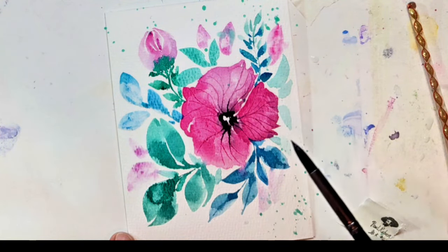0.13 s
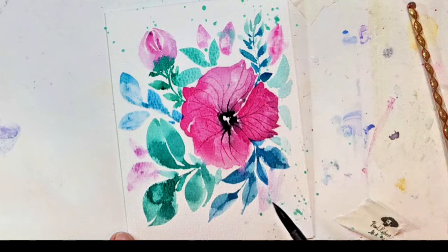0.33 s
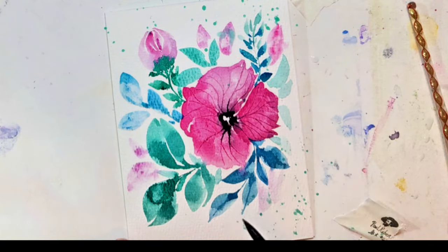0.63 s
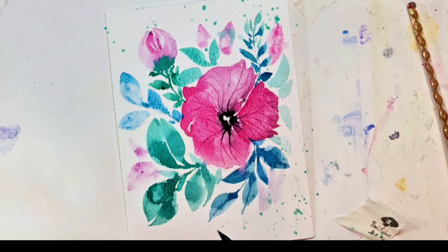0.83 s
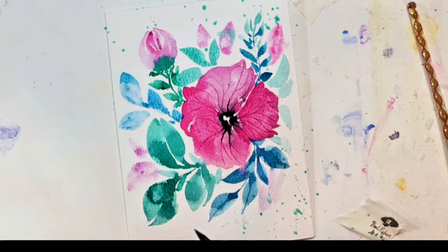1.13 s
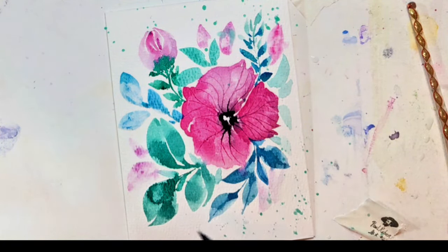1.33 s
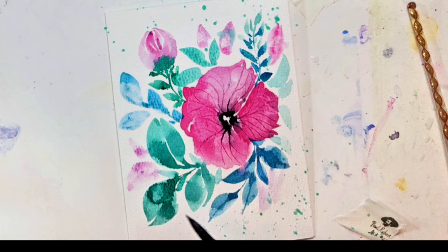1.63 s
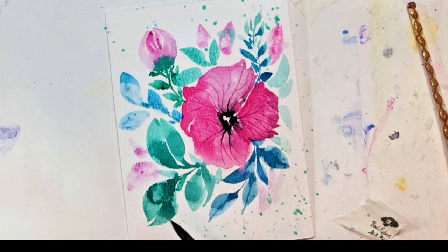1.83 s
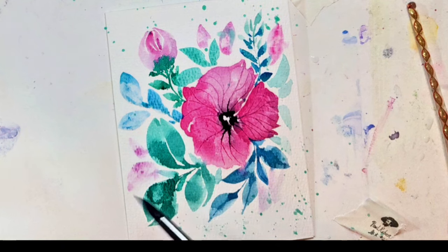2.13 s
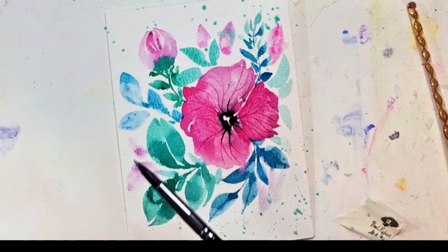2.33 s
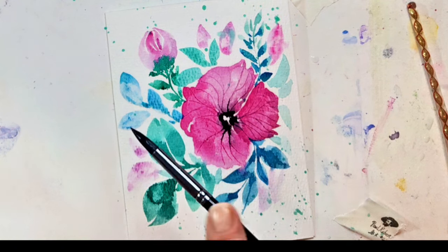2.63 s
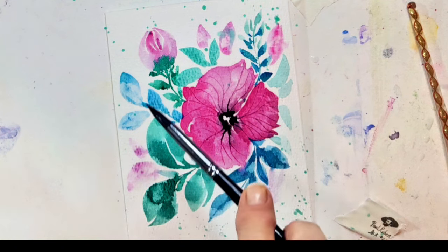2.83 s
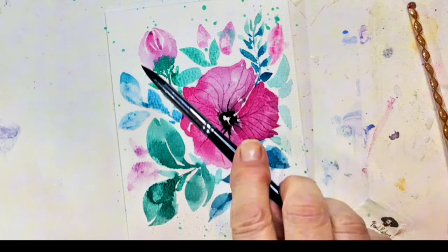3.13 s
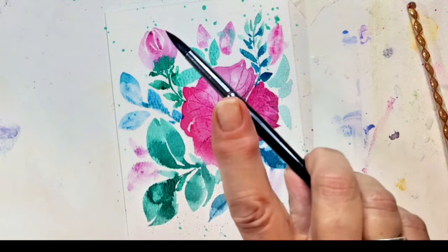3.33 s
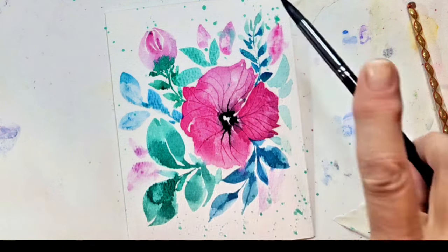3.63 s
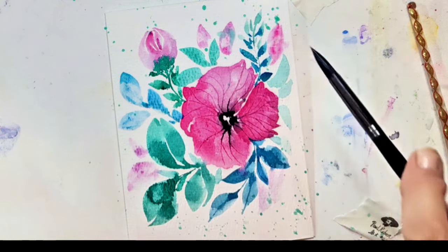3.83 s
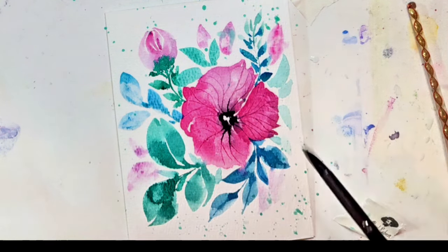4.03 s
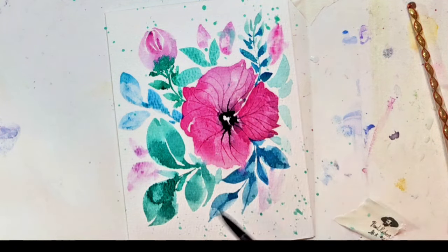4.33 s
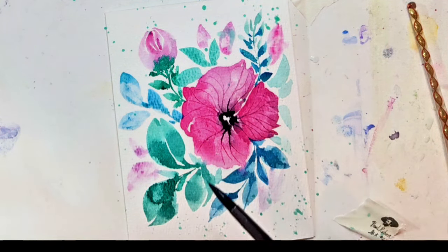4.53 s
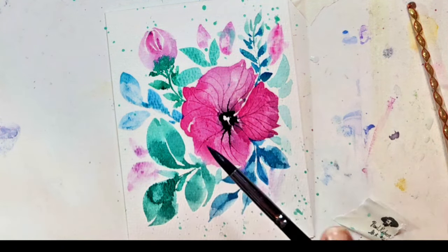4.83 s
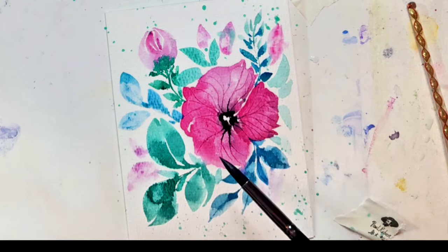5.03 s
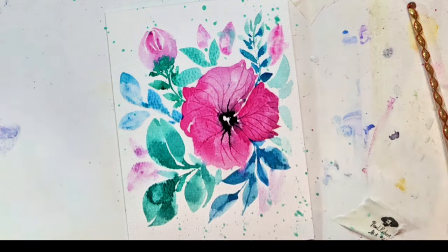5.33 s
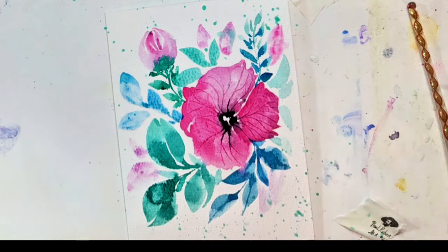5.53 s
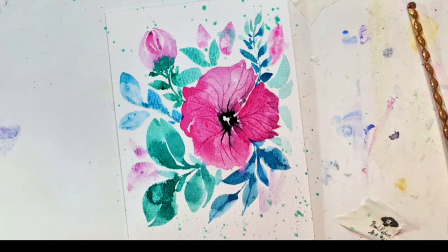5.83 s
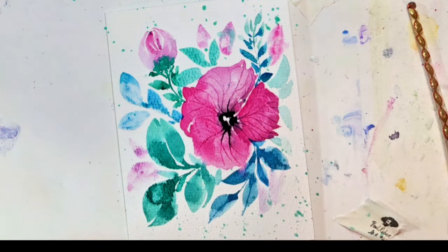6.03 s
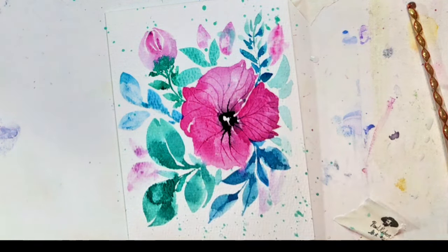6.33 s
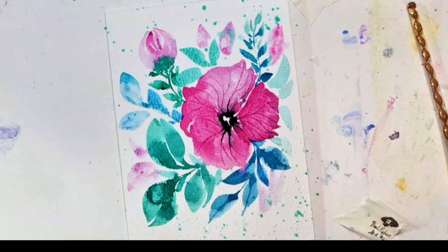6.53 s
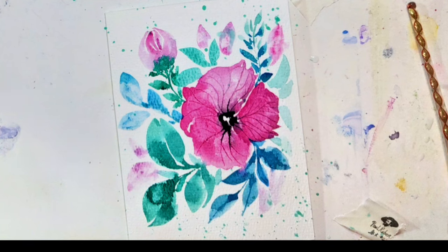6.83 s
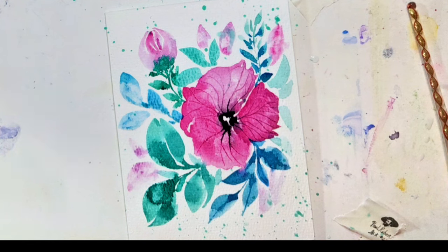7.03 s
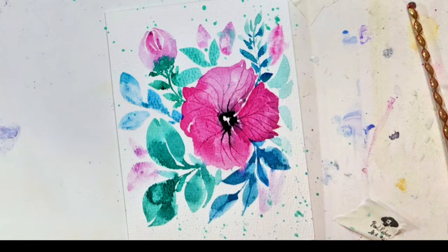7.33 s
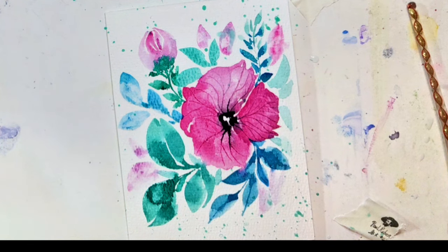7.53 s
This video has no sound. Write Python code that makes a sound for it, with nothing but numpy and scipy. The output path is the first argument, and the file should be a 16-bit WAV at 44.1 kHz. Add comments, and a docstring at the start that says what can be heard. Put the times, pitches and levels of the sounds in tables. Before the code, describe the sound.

In a quiet room with a low electrical hum and soft bassy murmur, a finger taps a paintbrush handle, about three dry ticks a second. The tapping stops; small clicks, dull desk thuds and brief papery rustles follow as the brush is moved. After a sharp click, it swirls and rattles in a glass of water, with tiny bubbles and strong rim knocks near the end. Close mono microphone, short room echoes.

```python
"""Paintbrush taps, then a glass of water

A finger taps a brush handle in a steady beat over a desk, in a quiet room with a mains hum.
Then the brush is moved about on the desk, wiped, stirred in a glass jar of water and knocked on its rim.
Taps and knocks are dying sines plus noise bursts; wipes, swirls, air and murmur are shaped noise;
bubbles are gliding sines, and the hum is a stack of steady sines. Short echoes follow the hits."""
import sys
import numpy as np
from scipy import signal
from scipy.fft import rfft, irfft
from scipy.io import wavfile
from scipy.ndimage import uniform_filter1d

SR = 44100
rng = np.random.default_rng(int(sys.argv[2]) if len(sys.argv) > 2 else 0)


def generate_wav(sig):
    """Save sig (samples, or channels by samples) to the path in sys.argv[1] as 16-bit PCM at SR."""
    pcm = np.round(np.clip(np.atleast_2d(sig).T, -1, 1) * 32767).astype(np.int16)
    wavfile.write(sys.argv[1], SR, pcm)


N = 339276  # length of the scene in samples

# brush against the jar: start_s, peak_db, favoured_ring_hz, second_ring_hz, second_ring_db,
# hardness_db_per_octave, ring_length_factor (at least 0.1 is used)
KNOCKS = [(6.217, -20.5, 1810, 2400, -13, -5, 0.32), (6.254, -33, 3720, 3200, 1, -6, 1.1),
          (6.295, -23, 3630, 2450, -22, -1, 2.1), (6.307, -6, 940, 2460, -2.5, -7.5, 0.61),
          (6.516, -15, 940, 1110, 0.5, -3, 2), (6.546, -16.5, 1760, 6740, -1, -4, 0.64),
          (6.554, -9, 1780, 1160, -5.5, -8, 1.46), (6.56, -8, 3720, 1150, -0.5, -2.5, 0.7),
          (6.589, -13.5, 1150, 2620, -11, -5.5, 1.04), (6.613, -11, 3750, 1220, 7.5, -1, 0.73),
          (6.642, -12, 980, 2450, -16, -6, 0.42), (6.679, -20.5, 2390, 960, 7, -3.5, 1.8),
          (6.7, -21.5, 1810, 7500, -10, -1.5, 0.6), (6.753, -18, 1650, 3630, -5, -8, 1.1),
          (6.774, -19, 2450, 6200, -11, 0, 0.81), (6.823, -10.5, 2400, 3650, -12, -4.5, 0.59),
          (6.835, -17.5, 8500, 6200, -11, -2, 0.53), (6.888, -13, 2340, 1770, 1, -3.5, 0.26),
          (6.905, -19.5, 2200, 8600, -8, -0.5, .4), (6.933, -21, 2430, 3670, -30, -10, .62),
          (6.994, -20.5, 3720, 1800, -4, -4, 0.47), (7.035, -16.5, 5850, 1380, 4, -1, 0.66),
          (7.092, -23.5, 2530, 1040, -7, -1, .61), (7.116, -26, 3700, 1200, 7, -11, 0.49),
          (7.226, -2, 3700, 1950, -4.5, -1, 0.54), (7.23, -5, 1100, 10400, -18, -9, 0.18),
          (7.493, -5.5, 1710, 3600, -1, 1.2, 0.55)]


def gain_of(db):
    """Turns decibels into a gain."""
    return 10 ** (np.asarray(db) / 20)


def evened(x):
    """Scales a signal to an rms of 1."""
    return x / np.sqrt(np.mean(np.abs(x) ** 2) + 1e-20)


def read(points, hz):
    """Reads a table of (Hz, value) between its points, on a log-frequency axis."""
    table_hz, value = np.transpose(points)
    return np.interp(np.log(hz + 1), np.log(table_hz + 1), value)


def add(mix, start_s, peak_db, sound):
    """Adds a sound to the mix from a given time, scaled to a given peak."""
    part = mix[round(start_s * SR):][:len(sound)]
    part += gain_of(peak_db) * sound[:len(part)] / np.abs(sound).max()


def rings(hz, db, t60, seconds):
    """A struck body rings as a sum of sines, each falling 60 dB in its t60 seconds."""
    t = np.arange(round(seconds * SR))[:, None] / SR
    fading = gain_of(db - 60 * t / np.maximum(t60, 1 / SR))
    return (fading * np.sin(2 * np.pi * hz * t)).sum(1)


def crack(colour, t60, seconds):
    """A sharp hit also makes a burst of noise with a given spectrum, dying fast."""
    size = round(seconds * SR)
    spectrum = rfft(rng.standard_normal(size))
    noise = irfft(spectrum * gain_of(read(colour, np.fft.rfftfreq(size, 1 / SR))), size)
    return noise * gain_of(-60 * np.arange(size) / SR / t60)


def hiss(colour, patchy_db, tilt=0, size=256):
    """Noise from random short-time spectra, with drifting patches and a slope that may change."""
    frames, hz = 4 * N // size + 5, np.fft.rfftfreq(size, 1 / SR)
    real, imaginary, patches = rng.standard_normal((frames, len(hz), 3)).T
    patches = uniform_filter1d(patches, size=6, axis=0)  # smooth over pitch
    patches = evened(uniform_filter1d(patches, size=8, axis=1))  # smooth over time
    slope = np.interp(np.arange(frames) * size / 4, np.arange(N), tilt * np.ones(N))
    colour_db = read(colour, hz)[:, None]
    flat = (real + 1j * imaginary) * gain_of(colour_db + patchy_db * patches)
    tilted = flat * gain_of(slope * np.log2((hz[:, None] + 100) / 3000))
    # the slope changes the brightness of a frame, not its loudness
    tilted *= np.linalg.norm(flat, axis=0) / np.linalg.norm(tilted, axis=0)
    return evened(signal.istft(tilted, nperseg=size, noverlap=3 * size // 4)[1][:N])


def rubbing(level_db, tilt, colour, patchy_db, grain_db):
    """Bristles that catch and slip make a grainy hiss; its brightness follows the level."""
    grains = evened(uniform_filter1d(rng.standard_normal(N), size=60))
    slope = np.clip(tilt[0] + tilt[1] * (level_db + 40), -6, 6)  # dB per octave
    grainy = hiss(colour, patchy_db, slope) * gain_of(grain_db * grains)
    return evened(grainy) * gain_of(level_db)


def hum():
    """The mains hum is a set of overtones of twice the mains rate, each wavering a little."""
    # overtones: pitch_hz, level_db (rms, before the small waver)
    overtones = [(200, -81.5), (300, -52.5), (400, -46), (500, -66.5), (700, -66.5), (800, -66),
                 (9700, -91), (9800, -70)]
    t = np.arange(N) / SR
    out = np.zeros(N)
    for hz, db in overtones:
        # slow sines with random phases, worked out at every 100th sample
        slow = [np.sin(2 * np.pi * (f * t[::100] + rng.random())) for f in np.geomspace(.3, 6, 12)]
        waver_db = 0.34 * np.interp(t, t[::100], evened(sum(slow)))
        tone = np.sqrt(2) * np.sin(2 * np.pi * (hz * t + rng.random()))
        out += gain_of(db + waver_db) * tone
    return out


def room_air():
    """The air of the quiet room is a soft, slightly patchy hiss."""
    # spectrum of the air: pitch_hz, relative_level_db (per Hz)
    air_colour = [(30, -9.5), (50, -9), (80, -11), (160, -14.5), (250, -13.5), (400, -12), (480, -17.5),
                  (600, -17.5), (2000, -22), (5000, -26), (9800, -28.5), (14000, -33.5), (16000, -45)]
    level_db = -45.5  # rms
    return gain_of(level_db) * hiss(air_colour, patchy_db=2.5, size=2048)


def murmur():
    """A low murmur is mostly bass noise that swells and fades."""
    # swells: time_s, level_db
    swells = [(0.0, -42.5), (1.8, -58), (2.1, -44.5), (2.48, -56), (3.02, -52.5), (3.94, -51.5),
              (4.24, -45.5), (4.73, -55.5), (5.14, -46), (6.66, -46), (7.24, -44), (7.39, -43), (7.69, -49)]
    # spectrum of the murmur: pitch_hz, relative_level_db (per Hz)
    murmur_colour = [(90, -6.5), (140, -13.5), (230, -5), (330, -3), (480, -6.5), (800, -65), (1500, -32)]
    s, db = np.transpose(swells)
    level_db = np.interp(np.arange(N) / SR, s, db)
    return gain_of(level_db) * hiss(murmur_colour, patchy_db=4.0, size=1024)


def taps():
    """Each finger tap is a dry tick that rings the short wooden modes of the handle."""
    # finger on the brush handle: start_s, peak_db
    finger_taps = [(0.21, -29.5), (0.5345, -27.5), (0.839, -27), (1.1383, -26.5), (1.4445, -24),
                   (1.7569, -22), (2.0778, -21.5), (2.3935, -25.5), (2.7037, -22.5), (3.0108, -21.5),
                   (3.3443, -25.5), (3.6571, -29.5), (3.9749, -32), (4.2792, -26), (4.602, -25),
                   (4.899, -31)]
    # modes of the handle, before each tap varies them: pitch_hz, relative_level_db, t60_s
    handle = [(2060, -9.5, 0.016), (3740, -7, 0.035), (4550, -14, 0.025), (6050, -0.5, 0.0058),
              (8600, -4, 0.053), (9140, -6.5, 0.028), (12300, -12, 0.018)]
    # brightness: slope_db_per_octave for a tap peaking at -26 dB, change_of_slope_per_db of peak
    tap_tilt = (-4, -0.15)
    out, (hz, db, t60) = np.zeros(N), np.transpose(handle)
    for start_s, peak_db in finger_taps:
        # firmer taps use more fingertip and are duller
        slope = tap_tilt[0] + tap_tilt[1] * (peak_db + 26)
        tilted_db = db + slope * np.log2(hz / 4000)
        varied_hz = hz * (1 + 0.0435 * rng.standard_normal(len(hz)))
        body = rings(varied_hz, tilted_db, t60, .04)
        tick_db = tilted_db + 3 * rng.standard_normal(len(hz))
        tick = crack([(700, -40), *zip(hz, tick_db), (16000, -30)], t60=.02, seconds=.04)
        add(out, start_s, peak_db, body + gain_of(15) * tick)
    return out


def contact(hz):
    """A touch lasts about half a cycle of the pitch it excites, so little is heard far above it."""
    return signal.windows.hann(round(.45 * SR / hz) + 2)[1:-1]


def clicks():
    """A few cycles at one pitch that die fast; the fewer the cycles, the broader the tick."""
    # small dry clicks and knocks of hand, brush and desk:
    # start_s, peak_db, pitch_hz, cycles (time to fade 20 dB; at least 0.3 is used)
    click_list = [(0.678, -32, 1610, 2.2), (0.7393, -16, 1880, 3.8), (0.797, -16.5, 7000, 0.94),
                  (0.7959, -22.5, 1540, 1.4), (1.9084, -20.5, 2980, 1.9), (2.624, -23.5, 1310, 4.2),
                  (2.785, -26.5, 3130, 1.9), (3.48, -27.5, 1220, 1.4), (3.698, -28, 1670, 4.5),
                  (5.221, -17, 4000, 1.2), (5.228, -14.5, 2460, 1.1), (5.282, -18, 1550, 1.4),
                  (5.295, -18, 6330, 4.5), (5.3109, -8, 3440, 2), (5.313, -12, 7200, 2.7),
                  (5.318, -13, 1520, 1.7), (6.0883, -3.5, 4570, 1.25), (6.439, -16, 3500, 0.28),
                  (7.013, -19, 7200, 3.3)]
    out = np.zeros(N)
    for start_s, peak_db, hz, cycles in click_list:
        body = rings(hz, 0, t60=3 * max(cycles, .3) / hz, seconds=.03)
        touched = np.convolve(contact(hz), body)
        brightened = signal.lfilter([1, -.8], [1], touched)
        add(out, start_s, peak_db, brightened)
    return out


def wipe():
    """Hand and brush rustle over paper and desk; strokes swell and die, and the strongest is heard."""
    # strokes: peak_time_s, peak_level_db, rise_db_per_s, fall_db_per_s
    strokes = [(2.875, -43, 130, 150), (5.17, -44.5, 36, 60), (5.229, -32.5, 450, 350),
               (5.295, -38, 220, 250), (5.47, -44.5, 160, 15), (5.639, -29, 420, 146),
               (5.742, -24.5, 1300, 159), (5.985, -36.5, 187, 246)]
    # spectrum of the rustle, before its tilt: pitch_hz, relative_level_db (per Hz)
    wipe_colour = [(180, -33), (300, -1.5), (667, 3.5), (814, -3.5), (1040, 1), (1580, -3.5), (1720, 1),
                   (2400, -5), (2880, -1), (5160, -8), (6100, -2.5), (8640, -13.5), (16000, -37)]
    # brightness: slope_db_per_octave at a level of -40 dB, change_of_slope_per_db of level
    wipe_tilt = (0.93, 0.16)
    t = np.arange(N) / SR
    levels = [db - np.maximum(rise * (s - t), fall * (t - s)) for s, db, rise, fall in strokes]
    first_knock_s = KNOCKS[0][0]
    level_db = np.where(t < first_knock_s, np.max(levels, axis=0), -140)
    return rubbing(level_db, wipe_tilt, wipe_colour, patchy_db=1.0, grain_db=1.0)


def bumps():
    """Dull thuds through the desk have a soft start and a second, higher board mode."""
    # thuds: start_s, peak_db, pitch_hz, t60_s
    thuds = [(4.841, -40.5, 155, 0.69), (5.109, -21.5, 123, 0.054), (5.135, -26.5, 125, 0.24),
             (5.258, -28, 239, 0.049), (5.32, -22, 378, 0.03), (5.46, -29.5, 134.6, 0.24),
             (6.311, -22, 366, 0.052), (6.561, -24.5, 343, 0.09), (6.781, -26, 323, 0.19),
             (7.229, -18.5, 238.5, 0.16), (7.236, -16.5, 311, 0.13), (7.537, -20, 212, 0.024)]
    out = np.zeros(N)
    for start_s, peak_db, hz, t60 in thuds:
        body = rings(hz * np.array([1, 1.7]), np.array([0, -8]), t60, .3)
        soft_start = 1 - np.exp(-np.arange(len(body)) / SR / 0.0014)
        add(out, start_s, peak_db, body * soft_start)
    return out


def swirl():
    """Wet bristles and water swirl along the glass, chattering in coarse grains."""
    # strength of the swirl: time_s, level_db
    strength = [(6.2, -50), (6.338, -40), (6.444, -49), (6.582, -44), (6.696, -30.5), (6.96, -34),
                (7.424, -49.5), (7.554, -40), (7.66, -56)]
    # spectrum of the swirl, before its tilt: pitch_hz, relative_level_db (per Hz)
    swirl_colour = [(150, -50), (250, -13), (393, -11), (597, -22), (1260, -3), (2440, -2), (3060, -14),
                    (3710, -7.5), (4050, -18), (6140, -15), (16000, -37)]
    # brightness: slope_db_per_octave at a level of -40 dB, change_of_slope_per_db of level
    swirl_tilt = (0.6, -0.3)
    s, db = np.transpose(strength)
    level_db = np.interp(np.arange(N) / SR, s, db, -140, -140)
    return rubbing(level_db, swirl_tilt, swirl_colour, patchy_db=1.8, grain_db=3.5)


def spot_db(hz, main_hz, second_hz, second_db, hardness):
    """Where the brush lands favours two rings; the rest sound faintly, the bass hardly at all."""
    sharpness = 36.5  # dB lost per octave away from a favoured ring
    rest_db = -14.5 + np.minimum(hardness * np.log2(hz / 1000), 6 * np.log2(hz / 900))
    main_ring_db = -sharpness * abs(np.log2(hz / main_hz))
    second_ring_db = second_db - sharpness * abs(np.log2(hz / second_hz))
    return np.max([rest_db + max(second_db, 0), main_ring_db, second_ring_db], axis=0)


def bounces(count):
    """After the hardest knock the brush bounces on, evenly spaced, ever fainter and higher."""
    start_s, gap_s = 7.253, 0.032
    first_peak_db, fade_db = -10, 4  # fade per bounce
    rows = []  # same columns as KNOCKS
    for k in range(count):
        main_hz = 1050 * 1.2 ** k
        second_db = -16 + 3.4 * k  # the second ring gains on the first
        rows.append((start_s + k * gap_s, first_peak_db - k * fade_db, main_hz, 3700, second_db, -4.5, .6))
    return rows


def jar():
    """Where the brush lands decides which rings sound; the moving water makes every ring flutter."""
    # rings of the water-filled glass, before each knock reshapes them: pitch_hz, relative_level_db, t60_s
    glass_rings = [(782, -15, 0.17), (941, 8.5, 0.095), (1090, 10, 0.056), (1160, 6.5, 0.079),
                   (1360, -4.5, 0.22), (1692, 4, 0.2), (1772.6, 7.5, 0.28), (1950, -2.5, 0.25),
                   (2137, 3, 0.17), (2408, 10, 0.12), (2624, 0, 0.16), (2795, 5.5, 0.068), (3130, -5, .1),
                   (3633, 2.5, 0.15), (3800, -6, 0.1), (3703, 7, 0.055), (4510, -20, 0.21), (4770, 0, 0.11),
                   (5420, 7.5, 0.058), (5880, 11.5, 0.053), (6140, 13, 0.051), (6650, 8, .12),
                   (7100, 7, 0.028), (7400, 11.5, 0.03), (8600, 6.5, 0.028), (9060, -4, .1),
                   (9380, 3, 0.17), (10680, -3.5, 0.3), (11800, -24, .1), (14600, -8, 0.1)]
    detune = 0.00847  # spread of each ring's pitch from knock to knock, as a share
    out, (hz, db, t60) = np.zeros(N), np.transpose(glass_rings)
    step, at = 64, np.arange(SR // 3)  # sizes are worked out every 64 samples
    t = at[:, None] / SR
    coarse_t = np.arange(len(at) // step + 2)[:, None] * step / SR
    # a ring needs a cycle or so to build up; the cosine closes it at the end
    shape = (1 - np.exp(-t * hz / 0.96)) * np.cos(np.pi / 2 * t / t[-1])
    sines = shape * np.sin(2 * np.pi * hz * t)
    cosines = shape * np.cos(2 * np.pi * hz * t)
    grid = np.geomspace(200, 16000, 40)  # Hz
    share = (at % step / step)[:, None]
    for start_s, peak_db, *spot, ringing in KNOCKS + bounces(count=6):
        ringing = max(ringing, .1)
        wobble = rng.standard_normal((2, len(coarse_t), len(hz)))
        flutter = .45 * evened(uniform_filter1d(wobble, size=12, axis=1))
        # most energy leaves fast through hand and water, a faint part rings on
        fast = gain_of(-60 * coarse_t / (t60 * ringing))
        faint = gain_of(-20.5 - 60 * coarse_t / (5.4 * t60 * ringing))
        size = (flutter + [[[1]], [[0]]]) * (fast + faint) * gain_of(db + spot_db(hz, *spot))
        # the water level shifts each ring a little
        turn = 2 * np.pi * detune * hz * rng.standard_normal(len(hz)) * coarse_t
        sine_size = size[0] * np.cos(turn) - size[1] * np.sin(turn)
        cosine_size = size[0] * np.sin(turn) + size[1] * np.cos(turn)
        size = np.array([sine_size, cosine_size])
        smooth = size[:, at // step] * (1 - share) + size[:, at // step + 1] * share
        tones = (smooth[0] * sines + smooth[1] * cosines).sum(1)
        crack_db = spot_db(grid, *spot) - 18 * (grid / 16000) ** 2
        body = crack([*zip(grid, crack_db)], 0.24 * ringing, len(at) / SR)
        soft_start = 1 - np.exp(-t[:, 0] / 0.0016)
        add(out, start_s, peak_db, tones + gain_of(14.0) * body * soft_start)
    return out


def bubbles():
    """Bubbles are sines that glide upward as they near the surface."""
    # rising bubbles: start_s, peak_db, start_hz, end_hz, length_s
    bubble_list = [(6.749, -22.5, 1536, 3510, 0.028), (6.784, -23.5, 624, 1060, 0.0217),
                   (6.798, -23.5, 1166, 1870, 0.0223), (6.893, -23.5, 2090, 2595, 0.0256),
                   (7.032, -27, 1156, 1670, 0.018)]
    out = np.zeros(N)
    for start_s, peak_db, start_hz, end_hz, seconds in bubble_list:
        hz = np.geomspace(start_hz, end_hz, round(seconds * SR))
        glide = np.sin(2 * np.pi * np.cumsum(hz) / SR)
        add(out, start_s, peak_db, glide * signal.windows.tukey(len(hz), .6))
    return out


def room(x):
    """Echoes are sparse taps of random sign after a short gap, each band dying at its own speed."""
    # how fast echoes die: pitch_hz, t60_s
    echo_times = [(300, 0.53), (1000, 0.16), (3000, 0.09), (8000, 0.11), (14000, 0.045)]
    echoes = np.zeros(SR // 2)
    at = np.arange(80, SR // 2 - 10, 10)
    echoes[at + rng.integers(0, 10, len(at))] = rng.choice([-1., 1.], len(at))
    hz, t, bands = signal.stft(echoes, SR, nperseg=128)
    fading = gain_of(-60 * t / read(echo_times, hz)[:, None])
    tail = signal.istft(bands * fading, SR, nperseg=128)[1]
    tail[:80] = 0  # the short gap
    return signal.fftconvolve(x, tail / np.linalg.norm(tail))[:N]


def scene():
    """Brush sounds with echoes of the taps, clicks and glass, over the air, murmur and hum."""
    dry_hits = taps() + clicks()
    glass = jar() + bubbles()
    echoes = room(gain_of(-5) * dry_hits + gain_of(-6) * glass)
    brush = dry_hits + glass + bumps() + wipe() + swirl()
    background = room_air() + murmur() + hum()
    return (brush + echoes + background)[None]


def record(dry):
    """The microphone drops the lowest bass; then a steep filter cuts the highest treble."""
    bass_cut = signal.butter(6, 44, "high", fs=SR, output="sos")  # Hz
    thin = signal.sosfilt(bass_cut, dry)
    treble_cut = signal.firwin(511, 15850, window=("kaiser", 9), fs=SR)  # Hz
    return signal.oaconvolve(thin, treble_cut[None], "same")


dry = scene()
out = record(dry)
generate_wav(out)
```